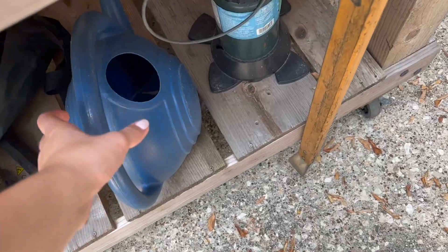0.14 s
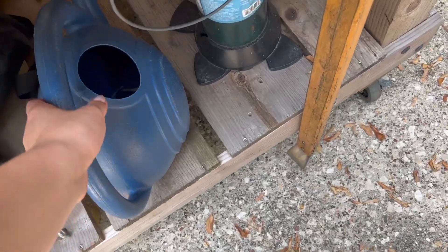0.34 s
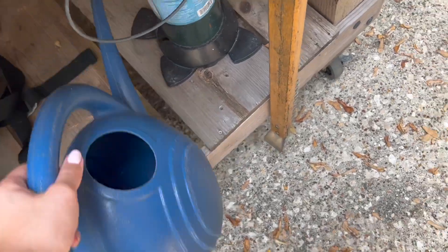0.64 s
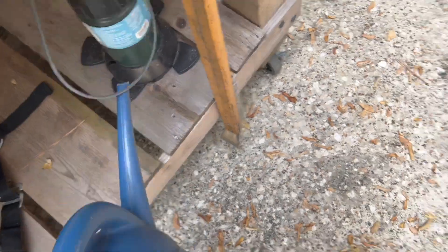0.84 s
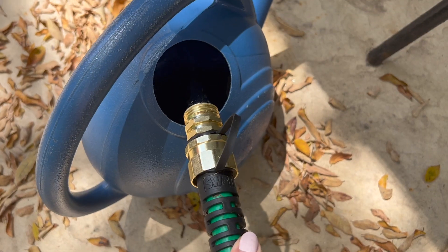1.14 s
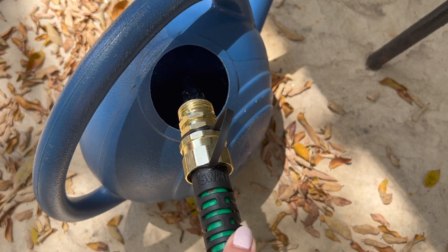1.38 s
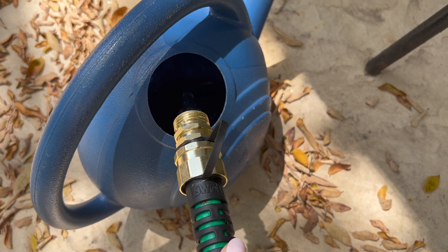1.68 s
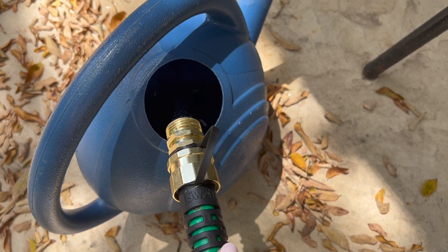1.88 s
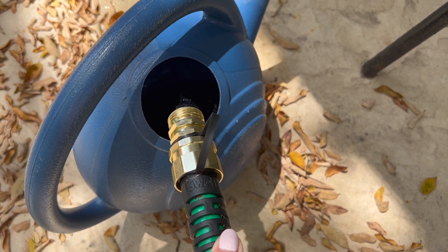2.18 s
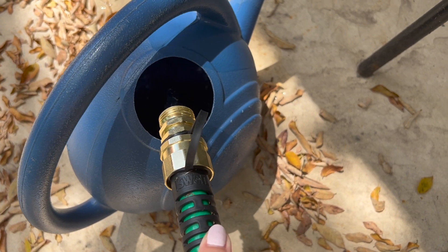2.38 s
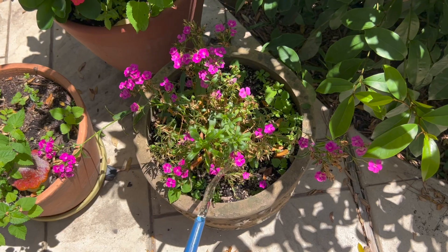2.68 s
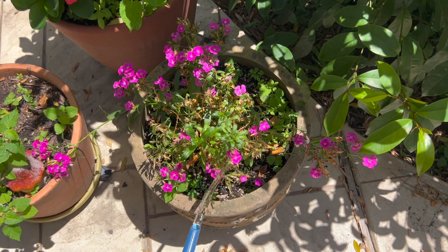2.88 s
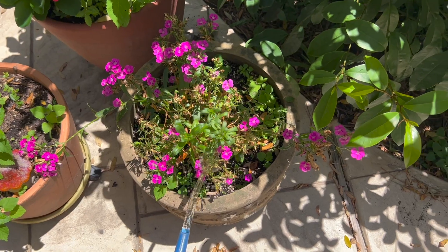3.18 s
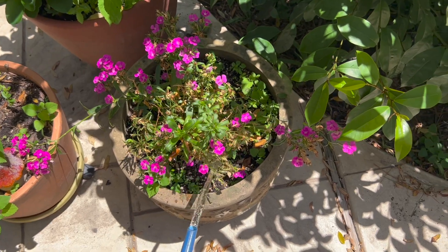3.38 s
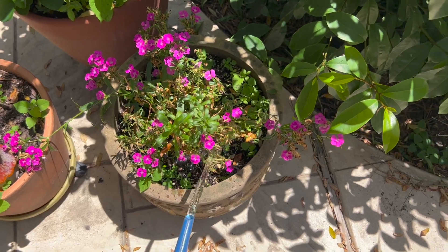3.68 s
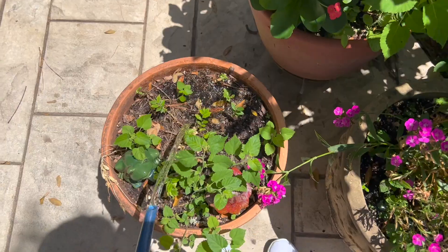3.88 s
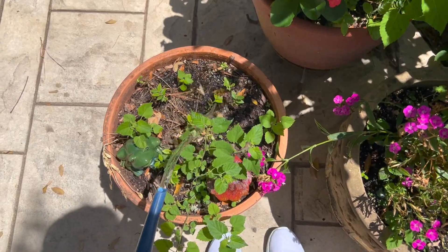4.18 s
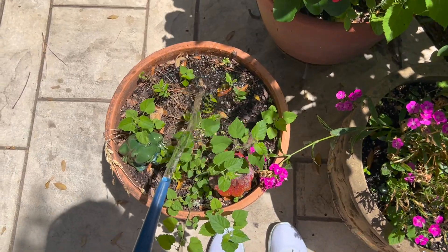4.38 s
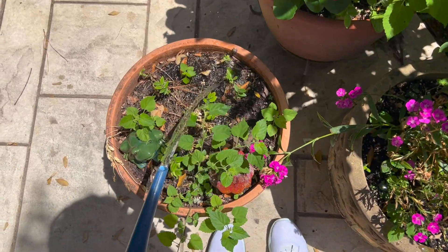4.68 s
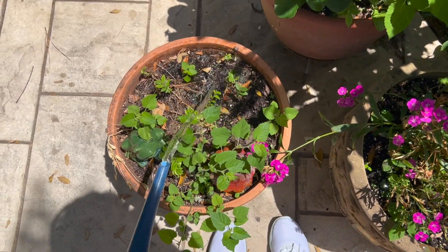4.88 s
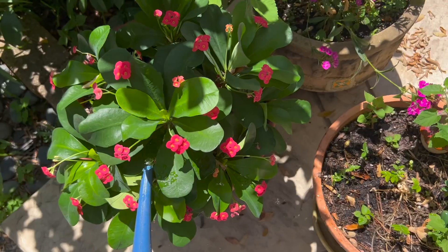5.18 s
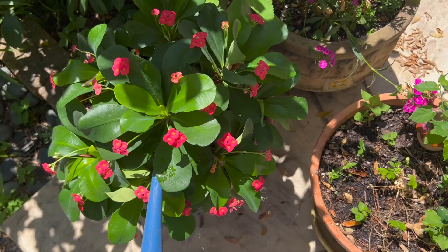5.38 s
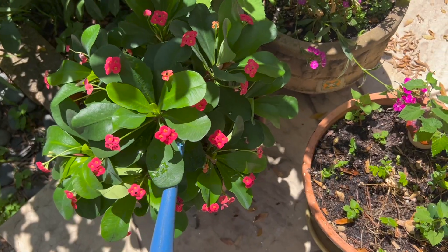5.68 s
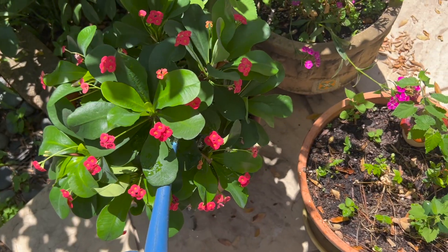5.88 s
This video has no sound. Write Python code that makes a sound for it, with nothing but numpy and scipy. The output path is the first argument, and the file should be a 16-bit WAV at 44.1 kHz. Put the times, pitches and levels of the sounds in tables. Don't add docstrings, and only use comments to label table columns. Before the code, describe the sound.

Hollow plastic watering can is knocked and scraped off boards, a hose fills it with splashing and booming, then water trickles onto potted plants amid insects.

```python
import sys
import numpy as np
from scipy import signal
from scipy.fft import rfft, irfft
from scipy.io import wavfile
from scipy.ndimage import uniform_filter1d, minimum_filter1d

SR = 44100
rng = np.random.default_rng(int(sys.argv[2]) if len(sys.argv) > 2 else 0)


def generate_wav(sig):
    pcm = np.round(np.clip(np.atleast_2d(sig).T, -1, 1) * 32767).astype(np.int16)
    wavfile.write(sys.argv[1], SR, pcm)


def how_loud(loudness_db):
    steps = np.asarray(loudness_db, float) / 20
    return 10 ** steps


N = 266716

# start in seconds, stop in seconds, fade-in in seconds.
TAKES = [
    (0, .93, .001),
    (.925, 2.617, .005),
    (2.617, 3.7505, .003),
    (3.767, 5.018, .008),
    (5.052, 6.1, .008),
]
# frequency in Hz, density in dB per Hz.
AIR_COLOUR = [
    [(60, 6.5), (130, -8), (200, -7.5), (300, -14), (1700, -27), (6500, -27.5), (8500, -26), (12000, -30)],
    [(55, 3), (120, -1), (250, -10.5), (500, -13), (1700, -19.5), (2800, -23.5), (7500, -26.5),
     (12000, -20.5)],
    [(55, 4.5), (120, 1.5), (250, -2), (500, -4.5), (1700, -23.5), (4500, -13.5), (7500, -11.5),
     (12000, -11)],
    [(55, -2), (120, 6.5), (250, -0.5), (500, -2), (2000, -26), (4500, -13.5), (7500, -14.5),
     (12000, -10.5)],
    [(55, 4.5), (120, 1.5), (250, -8), (500, -6), (2000, -27.5), (4500, -18.5), (7500, -9), (12000, -14.5)],
]
AIR_DB = [-46.5, -41, -44, -45, -42]
# frequency in Hz, likeness from 0 to 1.
PORT_LIKENESS = [(60, 0.94), (200, 0.69), (500, 0), (1300, 0), (3000, 0.6), (5500, 0.24), (7000, 0.68),
                 (16000, 1)]
# frequency in Hz, gain in dB.
MIC_COLOUR = [(30, -10.5), (55, -1.5), (7500, 1), (9300, -1), (11500, -13), (15300, -9.5), (16500, -21)]
# time in seconds, rumble in dB.
TRAFFIC = [(0, 7), (.15, 0), (.9, 3.5), (1.4, 1), (2.6, 1.5), (2.8, 3), (3.1, -2), (3.45, 4.5), (3.62, 8),
           (3.8, 3), (4.2, 2), (4.5, 5), (4.75, 0.5), (4.95, 3.5), (5.1, 1), (5.7, 1.5), (6.05, 8.5)]
# time in seconds, strength in dB.
FLOW = [(0, 2), (.4, 9.5), (.72, 6), (.94, -2.5), (1.2, 4.5), (1.38, -3.5), (1.55, -0.5), (2.2, 4),
        (2.61, 3), (2.65, -1.5), (3.1, 4.5), (3.745, 7), (3.8, 6), (4.1, 2), (4.4, 3.5), (4.95, 3.5),
        (5.2, -1.5), (6.05, 0.5)]
# frequency in Hz, share.
TRAFFIC_SHARE = [(70, .2), (200, 1), (400, 0.68), (900, 0)]
# frequency in Hz, share.
FLOW_SHARE = [(200, 0), (900, 0.54), (6000, 0.47)]

# frequency in Hz, level in dB.
TONES = [
    [(608.3, -70), (1179, -74), (1340, -73), (2826, -79)],
    [(726.7, -63), (1184, -63), (2826, -63), (2945, -61), (7402, -68)],
    [(5712, -70), (5798, -67), (6944, -70), (8016, -69)],
    [(5308, -77), (5950, -74), (6514, -72)],
    [(4307, -66), (5475, -67), (5970, -65), (6293, -66), (6465, -66), (7472, -63), (7531, -64), (7876, -67),
     (8027, -64), (8387, -61), (8533, -64)],
]
TONE_WIDTH_HZ = [3.2, 10.2, 1.6, 3.9, 1.9]
TONE_FADE_DB_PER_S = [0, 0, -1.5, -3, 0]
# take index, lowest partial in Hz, spacing in Hz, number of partials.
BUZZES = [
    (2, 5168, 543.7, 7),
    (3, 7182, 287.2, 6),
]
BUZZ_DB = [-67, -70]
BUZZ_SLOPE_DB = [-.5, -.4]
# drops per second, level in dB, lowest Hz, highest Hz.
PATTER = [
    (60, -70, 2700, 31000),
    (520, -55.5, 865, 13000),
    (900, -64, 2420, 13000),
    (900, -68, 1530, 6000),
    (245, -59, 8200, 19000),
]

# frequency in Hz, level in dB.
DRONE = [(60, -59), (120, -62), (222, -59)]
# time in seconds, level in dB.
WHINE = [
    (3.9, -80),
    (4.1, -74),
    (5.0, -75),
    (5.1, -70),
    (6.05, -72),
]
# time in seconds, level in dB.
SINGER = [
    (5.2, -82),
    (5.27, -58),
    (5.45, -51.5),
    (6.05, -58.5),
]
PAIR_HZ = [4280, 4370]
# time in seconds, level in dB.
PAIR = [
    (3.85, -77.5),
    (4.05, -59),
    (4.25, -65),
    (4.4, -62),
    (4.6, -63),
    (4.78, -61),
    (4.9, -74),
    (5.01, -74),
]
# time in seconds, pitch in Hz, level in dB.
CHIRR = [
    (2.64, 7800, -75),
    (2.72, 7720, -53),
    (2.82, 7650, -64),
    (2.92, 7380, -50),
    (3.03, 7400, -49),
    (3.08, 7400, -76),
]

# frequency in Hz, level in dB, T60 in seconds.
CAN_MODES = [(131.4, -25, 0.25), (192.5, -3.5, 0.086), (229, -12, 0.24), (646, -20.5, 0.11),
             (771, -8.5, 0.045), (870, -17, 0.051), (1156, -11, 0.032), (1220, -4.5, 0.031),
             (1680, -8, 0.028), (2000, -3.5, 0.011), (2320, -7.5, 0.018), (3200, -30, 0.024),
             (4340, -10, 0.055), (4910, -20, 0.12), (6430, -19, 0.052), (7400, -10.5, 0.047),
             (8740, -10, 0.026), (11800, -38, .05), (14500, -28, .06), (14760, -28, .06), (15200, -28, .06)]
# start in seconds, blow in dB, scrape in dB, scrape T60 in seconds,
# brightness in dB per octave.
KNOCKS = [
    (0.7439, -16, -22.5, 0.086, -1.5),
    (0.751, -15, -29, 0.18, 1.5),
    (.761, -38, -22.5, 0.083, 3),
    (0.7775, -23, -21, 0.16, 0.5),
    (0.793, -35, -42.5, 0.38, -8.5),
    (0.81, -36.5, -31.5, 0.14, 3.5),
    (0.8426, -46, -29.5, 0.23, 6.5),
    (0.849, -30, -37, 0.055, -3.5),
    (0.88, -31, -39, 0.11, -6.5),
]
# frequency in Hz, left minus right in dB.
KNOCK_LEFT = [(250, 2), (700, 13.5), (1500, 5.5), (3000, 9), (6000, 8.5), (9000, 1)]
# pitches in Hz, then levels in dB.
BOOM_HZ = [55.9, 113.3, 413]
BOOM_DB = [-45, -45, -53.5]
# time in seconds, level in dB.
JET = [
    (.93, -13),
    (1.07, -0.5),
    (2.09, -4),
    (2.23, -3),
    (2.61, -1.5),
]

# start in seconds, peak in dB, ring in Hz.
FILL_SPLASHES = [(0.948, -26.5, 7060), (1.0356, -23.5, 4330), (1.126, -30, 5100), (1.157, -23.5, 4560),
                 (1.2327, -33, 4500), (1.3003, -31, 4340), (1.4237, -40, 7400), (1.4641, -28, 7300),
                 (1.4906, -35, 7700), (1.5162, -27, 8800), (1.535, -23, 7140), (1.5619, -28, 7400),
                 (1.6434, -19.5, 7400), (1.6883, -19.5, 7400), (1.8951, -26, 7450), (1.977, -35, 7290),
                 (1.503, -41, 5970), (2.0053, -25.5, 5040), (2.0742, -41, 6620), (2.0898, -17.5, 7070),
                 (2.117, -20.5, 7400), (2.3172, -24, 4800), (2.4166, -22.5, 7400), (2.439, -21, 7000),
                 (2.4868, -35, 7600), (2.511, -24.5, 5700), (2.6105, -27, 5630)]
# start in seconds, peak in dB, ring in Hz.
POT_SPLASHES = [(2.799, -33, 7400), (2.954, -25, 7500), (2.9859, -26, 7500), (3.0357, -23.5, 6300),
                (3.114, -22, 6000), (3.139, -28, 6050), (3.4863, -24.5, 5550), (3.5305, -20, 6000),
                (3.651, -27, 7500), (3.6737, -22.5, 5760), (3.735, -22.5, 7100), (3.773, -58, 7850),
                (4.308, -29, 8300), (4.3335, -19.5, 7230), (4.42, -27.5, 5400), (4.435, -29, 5760)]
# level at 2500 Hz in dB, change in dB per octave of ring pitch.
BODY_DB = [-11, -3.5]
BODY_DB_PER_OCTAVE = [-24, -3]
TOP_DB = [-4, -3]
# start in seconds, peak in dB, pitch in Hz.
FILL_BUBBLES = [(1.0118, -35, 1100), (1.037, -37.5, 1270), (1.088, -32, 2000), (1.1305, -31, 2780),
                (1.1838, -42, 937), (1.3863, -36.5, 1110), (1.438, -38, 2680), (1.463, -29.5, 2530),
                (1.502, -30.5, 1280), (1.537, -35, 2080), (1.691, -26, 1460), (1.76, -39, 1260),
                (1.9217, -31, 1250), (2.0146, -34, 1570), (2.0314, -29.5, 1250), (2.076, -32, 3080),
                (2.096, -29.5, 2000), (2.1204, -28.5, 1276), (2.2802, -36, 1250), (2.379, -31, 1450),
                (2.4336, -29.5, 1210), (2.4709, -34, 1170), (2.5126, -49, 2900), (2.553, -29, 1400),
                (2.5933, -44, 2680)]
# start in seconds, peak in dB, pitch in Hz.
FILL_GURGLES = [(1.21, -46, 1240), (1.224, -47, 1180), (1.259, -39, 730), (1.309, -42, 1160),
                (1.414, -42, 1360), (1.454, -34.5, 1050), (1.575, -37, 1320), (1.613, -40, 720),
                (1.633, -43, 880), (1.774, -43, 810), (1.859, -43, 680), (1.979, -39, 1430),
                (2.049, -39, 1240), (2.159, -40, 2960), (2.219, -42, 1240), (2.304, -34, 3470),
                (2.329, -38, 2800), (2.398, -34.5, 1170), (2.453, -39.5, 1180), (2.529, -37, 1140)]
# start in seconds, peak in dB, pitch in Hz.
SOIL_GURGLES = [
    (0.009, -36, 410),
    (3.541, -52, 360),
    (3.618, -54, 330),
    (4.967, -37, 330),
    (5.129, -41, 510),
    (5.176, -38, 646),
    (5.197, -38, 444),
    (5.328, -44, 636),
    (5.935, -41, 393),
    (5.999, -38, 400),
]
# start in seconds, peak in dB, pitch in Hz.
GULP = (1.088, -24, 420)
# start in seconds, peak in dB, pitch in Hz.
SLAPS = [
    (5.0, -39, 700),
    (5.129, -40, 1110),
    (5.178, -50, 900),
    (5.196, -47, 1300),
]
# start in seconds, peak in dB,
# pitch in Hz.
LEAF_DROPS = [(2.859, -40, 2260), (2.9025, -35, 3470), (2.9428, -46, 2540), (2.9872, -37, 3640),
              (3.1149, -41, 2570), (3.304, -36, 3130), (3.5045, -47, 2900), (3.5226, -34, 2740),
              (4.155, -44, 3330), (4.175, -34, 3200), (4.222, -42.5, 1050), (4.2588, -36, 3600),
              (4.3327, -50, 3430), (4.4429, -36, 3320), (4.454, -36.5, 3470), (4.5315, -40.5, 1880),
              (4.687, -37, 3450), (4.7385, -40, 3400), (4.864, -39, 3160),
              (2.8195, -47, 3880), (2.9347, -47, 3850), (2.9607, -40, 2580), (3.0215, -40, 3750),
              (3.1413, -45, 3800), (3.1832, -48, 3840), (3.4224, -39, 3890), (3.5608, -45, 3780),
              (3.6561, -42, 3800), (3.7234, -35, 3080), (4.0114, -55, 3650), (4.0784, -53, 3810),
              (4.1404, -39, 3900), (4.5735, -47, 3380), (4.6044, -41, 3450), (4.8244, -53, 3440),
              (4.9804, -51, 3890)]
# start in seconds, peak in dB, centre in Hz.
SPITS = [(0.9483, -37, 11500), (1.0092, -44, 15600), (1.1249, -40, 11800), (1.1576, -35, 12000),
         (1.2047, -39, 11800), (1.233, -40, 11400), (1.2835, -35, 11200), (1.3015, -38, 11300),
         (1.4242, -34, 15700), (1.4661, -32, 15300), (1.4906, -35, 15600), (1.504, -29, 14600),
         (1.5155, -26, 11900), (1.5619, -34, 14900), (1.5689, -25, 15200), (1.6245, -41, 15400),
         (1.6426, -46, 11800), (1.6876, -31, 15300), (1.731, -41, 11500), (1.8063, -40, 15200),
         (1.8278, -37, 11100), (1.9745, -36, 12100), (1.975, -39, 11600), (2.0732, -41.5, 15100),
         (2.0882, -40, 11100), (2.1171, -46, 12000), (2.1446, -35, 14800), (2.2174, -42, 15600),
         (2.2962, -38, 15700), (2.394, -54, 15300), (2.443, -29, 15200), (2.5112, -46, 14700),
         (2.6584, -39, 11400), (2.8485, -36, 15000), (2.9278, -44, 15200), (2.9527, -32, 14800),
         (2.9862, -42, 15700), (3.1144, -38, 12000), (3.141, -36, 11300), (3.1667, -45, 14700),
         (3.1817, -40, 15700), (3.3483, -42, 10700), (3.3758, -40, 14700), (3.4621, -41, 15500),
         (3.53, -32, 10800), (3.56, -38, 11300), (3.6556, -35, 11500), (3.7729, -53, 15700),
         (3.8342, -35, 15500), (4.0253, -45, 14600), (4.0572, -39, 11500), (4.141, -43.5, 15500),
         (4.1655, -41, 15400), (4.3057, -51, 11600), (4.306, -36, 11400), (4.3336, -40, 12300),
         (4.3336, -37, 15500), (4.4084, -41, 15400), (4.4344, -38, 15300), (5.0016, -42, 12200)]
# ring base in seconds, ring in cycles,
# ring in dB, puff T60 in seconds, puff width as share of pitch, puff in dB, puff build-up in seconds.
BUBBLE = (.016, 22, -5.5, .05, .45, -9.5, .0018)
LEAF = (.004, 14, -5.5, .016, .6, -7.5, .0004)
THUD = (.004, 3, -4, .03, 1.5, -9, .0005)


def evened(x):
    return x / np.sqrt(np.mean(x ** 2) + 1e-20)


def smoothed_twice(x, size):
    return evened(uniform_filter1d(uniform_filter1d(x, size=size), size=size))


def read(points, hz):
    f, value = np.transpose(points)
    return np.interp(np.log(hz + 1), np.log(f + 1), value)


def curve(rows, column=1):
    rows = np.transpose(rows)
    return how_loud(np.interp(np.arange(N) / SR, rows[0], rows[column], -120, -120))


def add(mix, s, sound):
    part = mix[..., round(s * SR):][..., :sound.shape[-1]]
    part += sound[..., :part.shape[-1]]


def ring(x, hz, width_hz):
    r = np.exp(-np.pi * width_hz / SR)
    return signal.lfilter([.5, 0, -.5], [1, -2 * r * np.cos(2 * np.pi * hz / SR), r * r], x)


def colour(x, db_at):
    gain = how_loud(db_at(np.fft.rfftfreq(x.shape[-1], 1 / SR)))
    return irfft(rfft(x) * gain, x.shape[-1])


def spread(x, db):
    late = np.roll(x, 40, axis=-1)
    echo = colour(late, lambda hz: read([(150, -9), (700, 4.5), (5500, 2.5), (7000, -61)], hz))
    return x + how_loud(db) * echo * np.array([[1], [-1]])


def steady(hz, width_hz, wobble_db=0., apart=0., count=N):
    walk, swell = rng.standard_normal((2, count // 64 + 2))
    swell = smoothed_twice(swell, 40)
    walk = np.cumsum(walk) * np.sqrt(2 * np.pi * width_hz * 64 / SR)
    walk, swell = (np.interp(np.arange(count) / 64, np.arange(len(v)), v) for v in (walk, swell))
    turn = np.array([[0], [apart * rng.uniform(-1.11, 1)]])
    phase = 2 * np.pi * hz * np.arange(count) / SR + walk + turn
    return np.sqrt(2) * how_loud(wobble_db * swell) * np.cos(phase)


def drop_ring(hz, t60, glide=0.37):
    t = np.arange(2000) / SR
    onset = 1 - np.exp(-t / .0003)
    return np.sin(2 * np.pi * hz * t * (1 + glide * t / t60)) * how_loud(-60 * t / t60) * onset


def air(k, count):
    frames, hz = count // 256 + 5, np.fft.rfftfreq(1024, 1 / SR)
    a, b, c, d, patches = rng.standard_normal((frames, 513, 5)).T
    patches = evened(uniform_filter1d(uniform_filter1d(patches, size=12, axis=0), size=10, axis=1))
    flicker = evened(uniform_filter1d(rng.standard_normal(frames), size=3)) * (hz[:, None] > 1500)
    t = TAKES[k][0] + np.arange(frames) * 256 / SR
    levels = np.array([np.interp(t, *np.transpose(v)) for v in (TRAFFIC, FLOW)])
    share = np.array([read(TRAFFIC_SHARE, hz), read(FLOW_SHARE, hz)])
    same = np.clip(read(PORT_LIKENESS, hz), 0, 1)[:, None]
    left = a + 1j * b
    right = same * left + np.sqrt(1 - same ** 2) * (c + 1j * d)
    still = how_loud(read(AIR_COLOUR[k], hz) + read(MIC_COLOUR, hz))
    moving = how_loud(share.T @ levels + 1.4 * patches + 1.23 * flicker)
    z = np.array([left, right]) * still[:, None] * moving
    noise = signal.istft(z, nperseg=1024, noverlap=768)[1][:, :count]
    return how_loud(AIR_DB[k]) * evened(noise)


def partials(k):
    buzz = []
    for (take, hz, step, count), db, slope in zip(BUZZES, BUZZ_DB, BUZZ_SLOPE_DB):
        if take == k:
            buzz += [(hz + n * step, db + n * slope) for n in range(count)]
    return TONES[k] + buzz


def patter(per_s, db, low_hz, high_hz, count):
    out = np.zeros(count)
    for hz in np.geomspace(low_hz, high_hz, num=16):
        falls = rng.random(count) < per_s / 16 / SR
        size = how_loud(4.8 * np.minimum(rng.exponential(1, count), 4)) * falls
        out += signal.oaconvolve(size, drop_ring(hz, 9 / hz + 0.0069))[:count]
    return how_loud(db) * evened(out)


def garden():
    out = np.zeros((2, N))
    for k, (start, stop, fade) in enumerate(TAKES):
        t = np.arange(0, stop - start + .035, 1 / SR)
        tones = sum(how_loud(db + 1.2) * steady(hz, TONE_WIDTH_HZ[k], wobble_db=2.8, apart=1.4, count=len(t))
                    for hz, db in partials(k))
        tones = tones * how_loud(TONE_FADE_DB_PER_S[k] * (t - 2.44))
        drops = spread(patter(*PATTER[k], len(t)), 1)
        gate = np.clip(t / fade, 0, 1) * np.clip((stop - start - t) / 0.0012, how_loud(-48), 1)
        add(out, start, gate * (air(k, len(t)) + tones + drops))
    return out


def far_hums():
    t = np.arange(N) / SR
    live = (t < TAKES[3][1]) | (t > TAKES[4][0])
    pots = live * (t > TAKES[2][0]) * ((t < TAKES[2][1]) | (t > TAKES[3][0]))
    engine = sum(how_loud(db) * steady(hz, 14.23, wobble_db=3.5, apart=0.44) for hz, db in DRONE)
    whine = curve(WHINE) * steady(1460, 7.45, wobble_db=2) * live
    return pots * curve(TRAFFIC) * engine + how_loud(0.5) * whine


def insects():
    singer = how_loud(-2) * curve(SINGER) * steady(4231, 1.6, apart=1.5)
    pair = curve(PAIR) * sum(steady(hz, 7.8, wobble_db=1.5, apart=1.1) for hz in PAIR_HZ)
    s, hz, _ = np.transpose(CHIRR)
    turns = np.cumsum(np.interp(np.arange(N) / SR, s, hz)) / SR
    rasp = smoothed_twice(rng.standard_normal(N), 200)
    chirr = curve(CHIRR, column=2) * np.sqrt(2) * rasp * np.cos(2 * np.pi * turns)
    return singer + pair + chirr


def leaning_hand():
    peak_s, rise_s, fall_s, db = .5, 0.18, 0.093, -42
    press = curve([(peak_s - rise_s, db - 25), (peak_s, db), (peak_s + fall_s, db - 25)])
    return press * steady(205, 8)


def knocks():
    t, out = np.arange(8192) / SR, np.zeros((2, N))
    for s, blow_db, scrape_db, t60, tilt_db in KNOCKS:
        blow = rng.standard_normal(len(t)) * np.exp(-t / 0.0038)
        scrape = rng.standard_normal((2, len(t))) * how_loud(-60 * t / t60)
        apart = colour(scrape[1], lambda hz: read([(300, 1), (1000, 1.0), (5000, 6.0), (8000, -9.0)], hz))
        scrape[1] = scrape[0] + apart
        bright = colour(scrape, lambda hz: tilt_db * np.log2((hz + 300) / 4000) - 12 * (hz < 400))
        drive = how_loud(blow_db) * blow / np.linalg.norm(blow) + how_loud(scrape_db - 29.0) * bright
        walls = sum(how_loud(db) * ring(drive, hz * rng.uniform(0.95, 1.025), 1.52 / ring_s)
                    for hz, db, ring_s in CAN_MODES)
        add(out, s, walls + how_loud(scrape_db) * bright)
    t = np.arange(N) / SR
    lifted = np.clip((.905 - t) / 0.035, .65, 1)
    lifted *= np.clip((t - KNOCKS[0][0]) / .001 + 1, 0, 1)
    placed = [colour(out[k], lambda hz: read(KNOCK_LEFT, hz) * (.5 - k)) for k in range(2)]
    return lifted * spread(np.array(placed), -10.5)


def filling_boom():
    modes = sum(how_loud(db) * steady(hz, 6.0, wobble_db=2.0, apart=0.98) for hz, db in zip(BOOM_HZ, BOOM_DB))
    return how_loud(3) * curve(JET) * modes


def splash(k, db, hz):
    t = np.arange(2000) / SR
    low_db = BODY_DB[k] + BODY_DB_PER_OCTAVE[k] * np.log2(hz / 6500)
    decay = np.exp(-t / 0.00089) + 0.45 * how_loud(-60 * t / 0.035)
    spray = rng.standard_normal(len(t)) * decay * (1 - np.exp(-t / 0.00054))
    tilt = [(800, low_db - 9), (2500, low_db), (6000, 0), (12000, TOP_DB[k])]
    spray = colour(spray, lambda f: read(tilt, f))
    return how_loud(db - 6.5) * (spray + drop_ring(hz, 0.0083, glide=0.01))


def plink(hz, base_s, cycles, ring_db, puff_s, width, puff_db, soft_s):
    t = np.arange(2000) / SR
    puff = evened(ring(rng.standard_normal(len(t)), hz, width * hz))
    puff = puff * how_loud(-60 * t / puff_s) * (1 - np.exp(-t / soft_s))
    return how_loud(ring_db) * drop_ring(hz, base_s + cycles / hz, glide=.04) + how_loud(puff_db) * puff


def spit(db, hz):
    t, width_hz = np.arange(2000) / SR, 0.46 * hz
    hiss = evened(ring(ring(rng.standard_normal(len(t)), hz, width_hz), hz, width_hz))
    return how_loud(db - 4.5 - 60 * t / .03) * hiss * (1 - np.exp(-t / 0.00088))


def water():
    out = np.zeros(N)
    for k, rows in enumerate([FILL_SPLASHES, POT_SPLASHES]):
        for s, db, hz in rows:
            add(out, s, splash(k, db, hz))
    for rows, kind, gain_db in [(FILL_BUBBLES + SOIL_GURGLES + FILL_GURGLES, BUBBLE, 1.5),
                                ([GULP] + SLAPS, THUD, 0), (LEAF_DROPS, LEAF, 4.0)]:
        for s, db, hz in rows:
            add(out, s, how_loud(db + gain_db) * plink(hz, *kind))
    for s, db, hz in SPITS:
        add(out, s, spit(db, hz))
    return spread(out, -9.5) * how_loud(np.array([[.8], [-.8]]))


def scene():
    return garden() + far_hums() + insects() + leaning_hand() + knocks() + filling_boom() + water()


def thin(ports):
    mid_side = np.array([ports.sum(0), ports[0] - ports[1]]) / 2
    hz, t, z = signal.stft(mid_side, SR, nperseg=2048, noverlap=1536)
    power = abs(z[:, :1024]) ** 2
    bands = power.reshape(2, 64, 16, -1)
    band = uniform_filter1d(bands.mean(2), size=3, axis=2)
    weak = (band < band[::-1] * how_loud(-2 * 4.5)) & (np.arange(64) >= 20)[:, None]
    weak[1, 43:] = True
    treble = uniform_filter1d(np.diff(ports[1], n=2, prepend=[0, 0]) ** 2, size=128)
    before = np.roll(uniform_filter1d(treble, size=1024), 576)
    rise = -minimum_filter1d(-treble / (before + 1e-14), size=800)
    rise = rise[np.minimum((t * SR).astype(int), N - 1)]
    weak &= rise < 6
    weak[:, 46:] = rise < 25
    typical = np.repeat(np.median(bands, axis=2), 16, axis=1)
    faint = (power < .62 * typical) & (hz[:1024, None] > 1400)
    z[:, :1024] *= np.repeat(~weak, 16, axis=1) & ~faint
    mid, side = signal.istft(z, SR, nperseg=2048, noverlap=1536)[1][:, :N]
    return np.array([mid + side, mid - side])


def top_cut(x):
    return signal.sosfilt(signal.butter(12, 16810, fs=SR, output="sos"), x)


def record(dry):
    lag_samples = 11.5
    hz = np.fft.rfftfreq(N, 1 / SR)
    late_hz = np.maximum(hz - 2 * SR / lag_samples, 0)
    lag = np.exp(-2j * np.pi * late_hz / SR * lag_samples)
    ports = np.array([irfft(rfft(dry[0]) * lag, N), dry[1]])
    ports = signal.sosfilt(signal.butter(3, 38, "highpass", fs=SR, output="sos"), ports)
    ports = colour(ports, lambda f: read([(16250, 0), (16550, -40)], f))
    return top_cut(thin(ports))


dry = scene()
out = record(dry)
generate_wav(out)
```